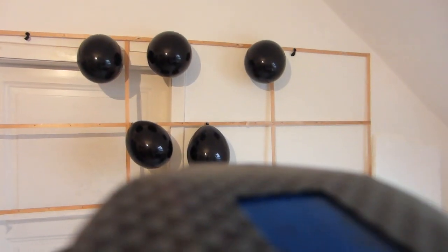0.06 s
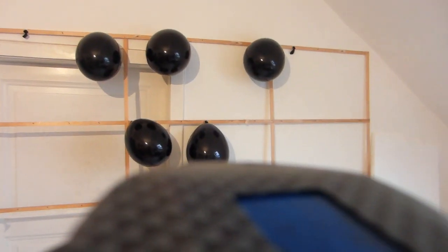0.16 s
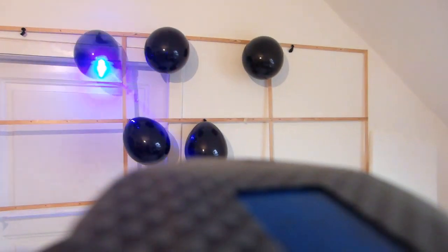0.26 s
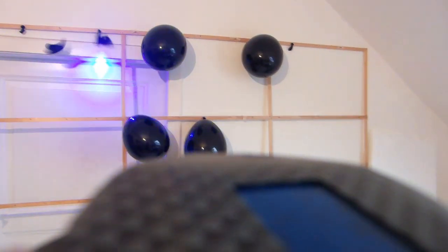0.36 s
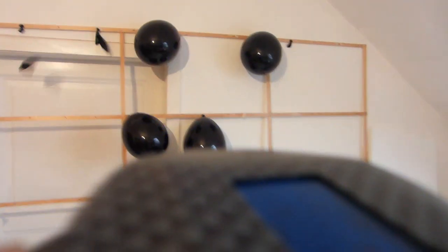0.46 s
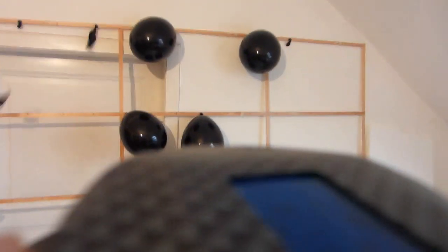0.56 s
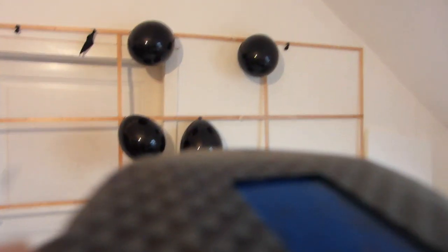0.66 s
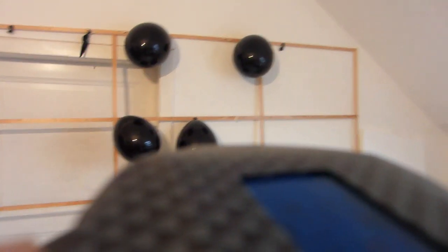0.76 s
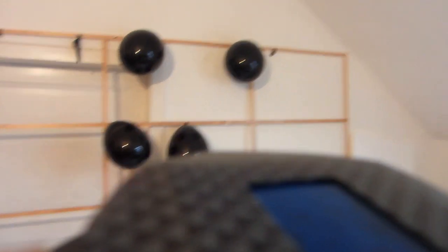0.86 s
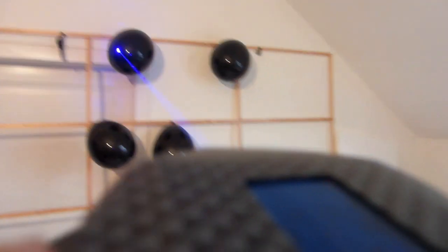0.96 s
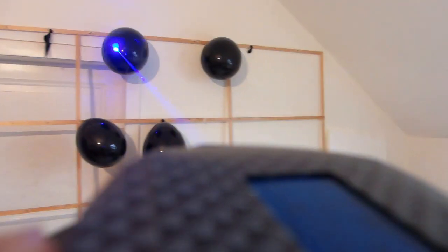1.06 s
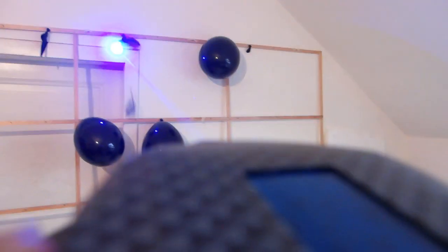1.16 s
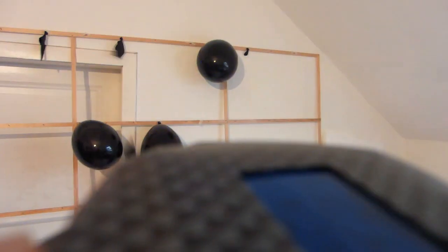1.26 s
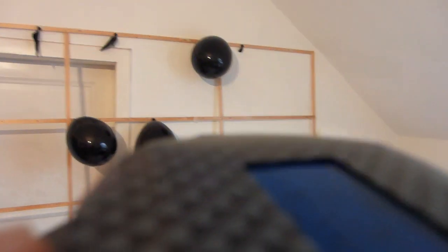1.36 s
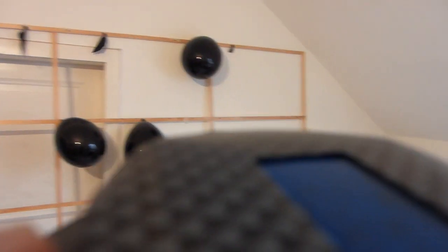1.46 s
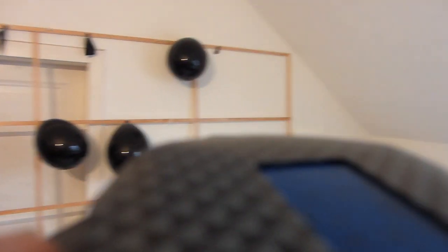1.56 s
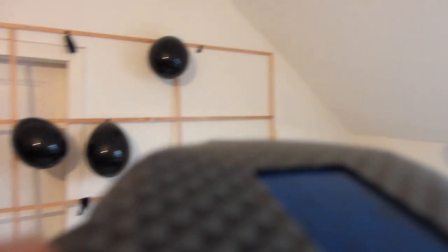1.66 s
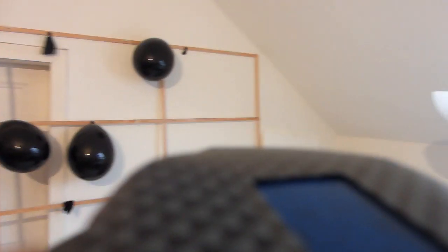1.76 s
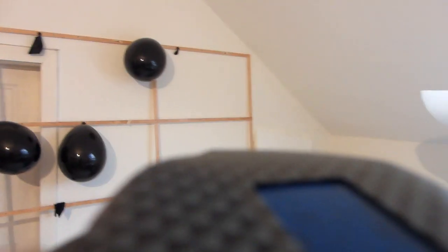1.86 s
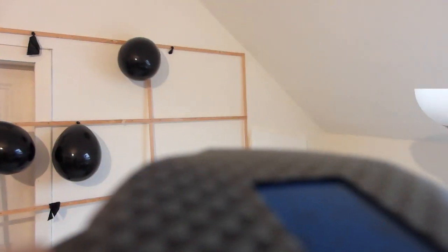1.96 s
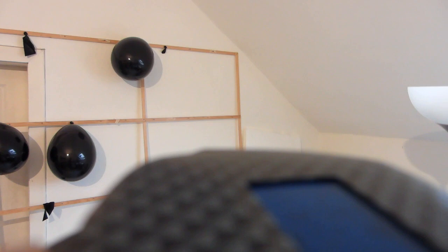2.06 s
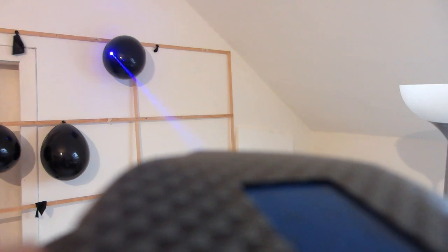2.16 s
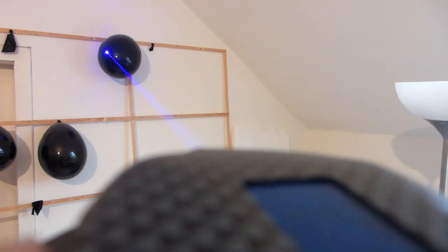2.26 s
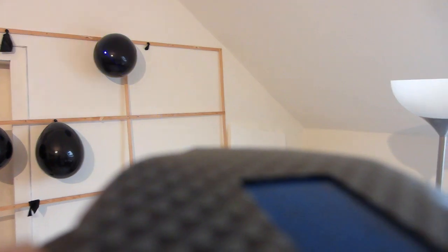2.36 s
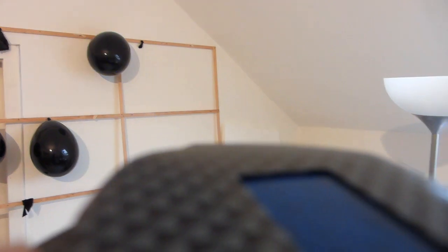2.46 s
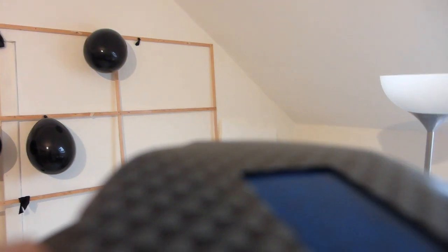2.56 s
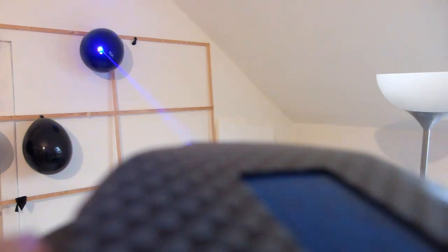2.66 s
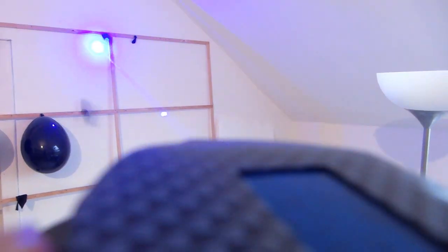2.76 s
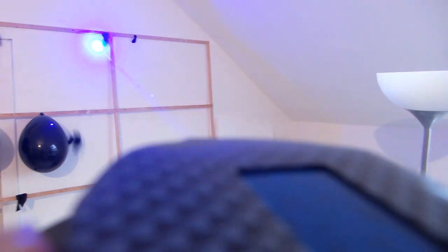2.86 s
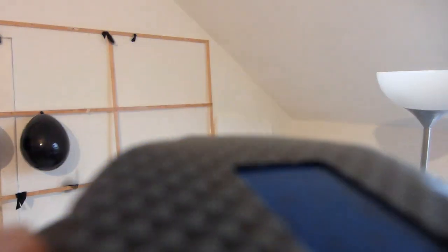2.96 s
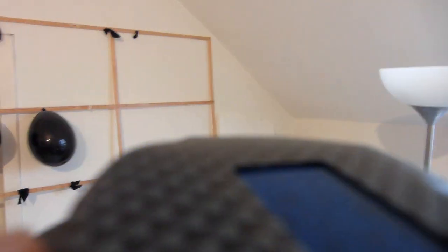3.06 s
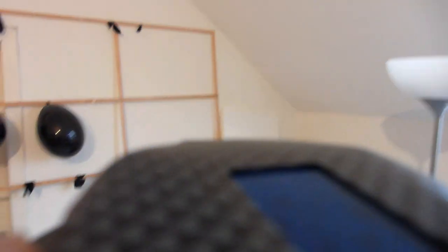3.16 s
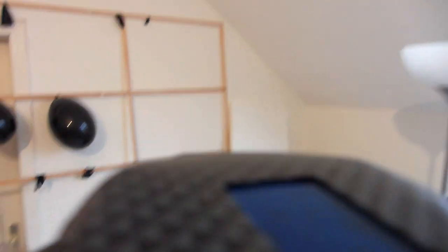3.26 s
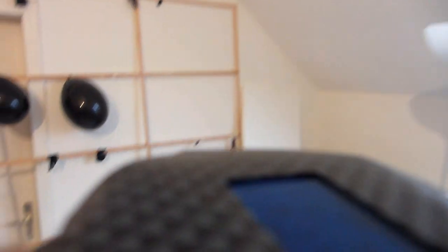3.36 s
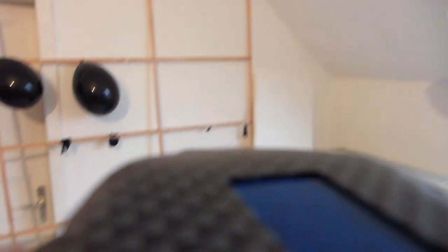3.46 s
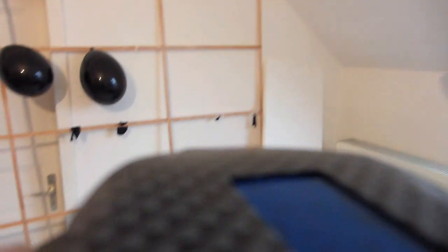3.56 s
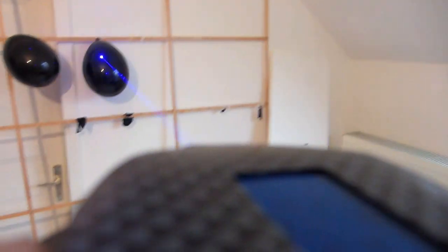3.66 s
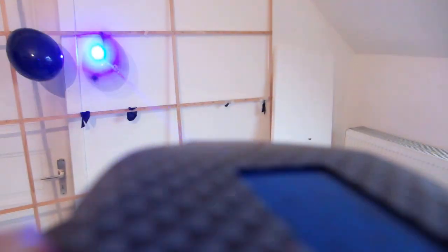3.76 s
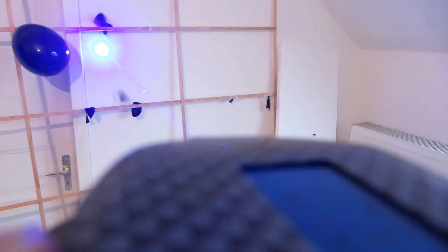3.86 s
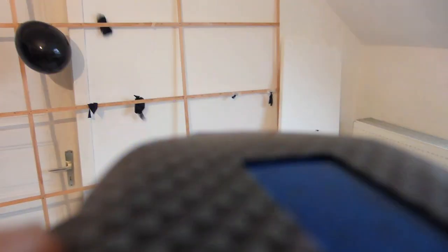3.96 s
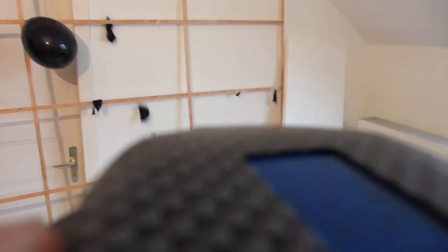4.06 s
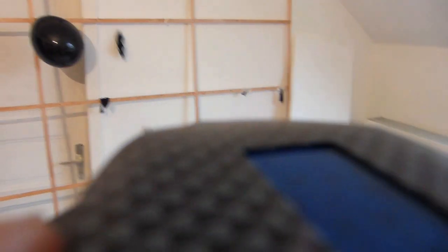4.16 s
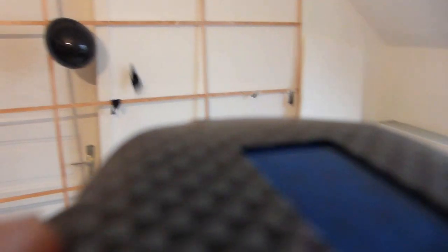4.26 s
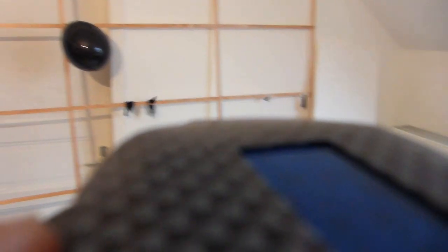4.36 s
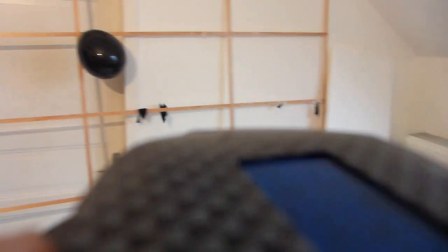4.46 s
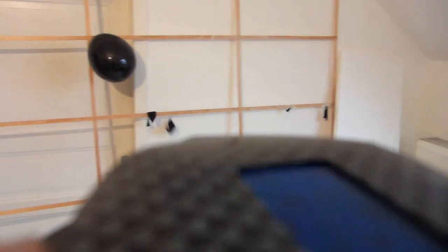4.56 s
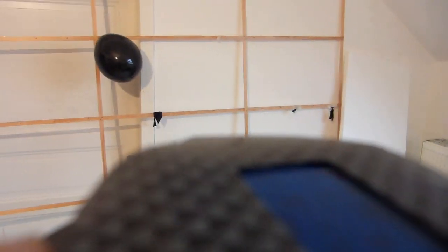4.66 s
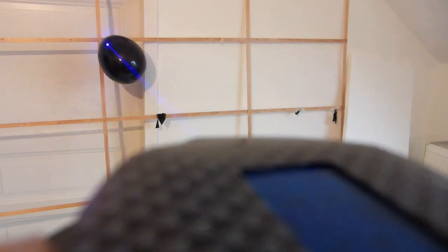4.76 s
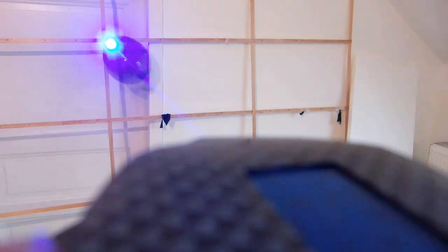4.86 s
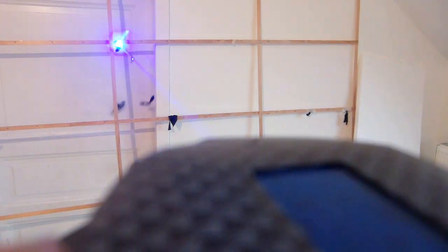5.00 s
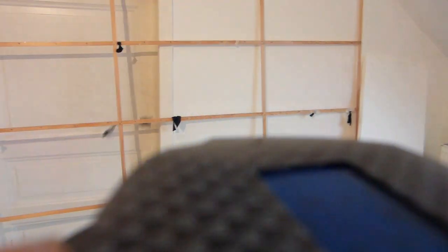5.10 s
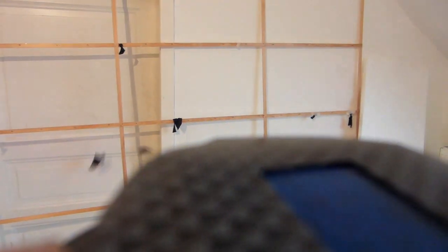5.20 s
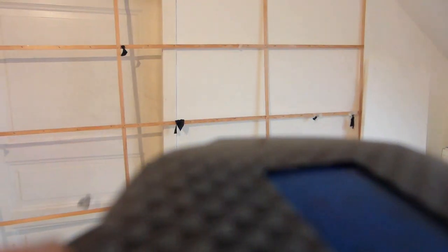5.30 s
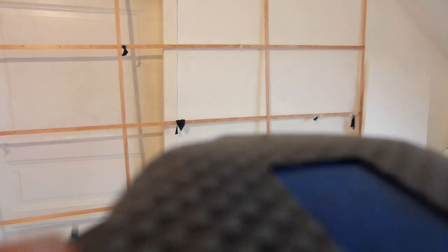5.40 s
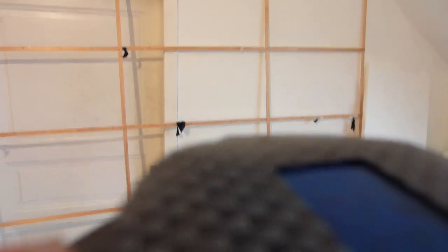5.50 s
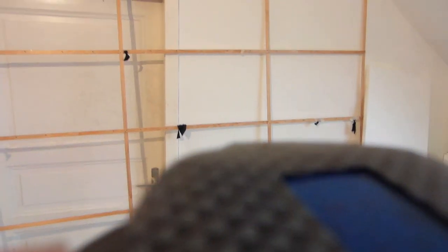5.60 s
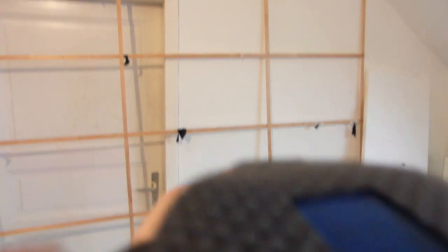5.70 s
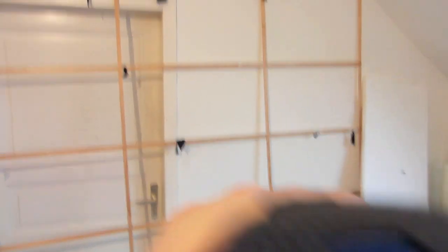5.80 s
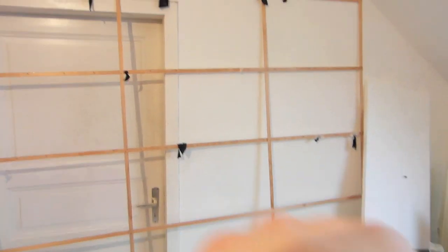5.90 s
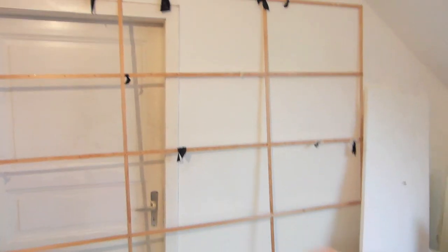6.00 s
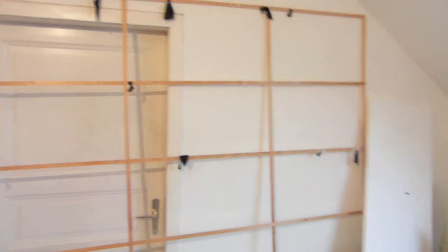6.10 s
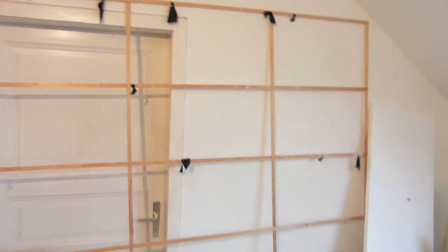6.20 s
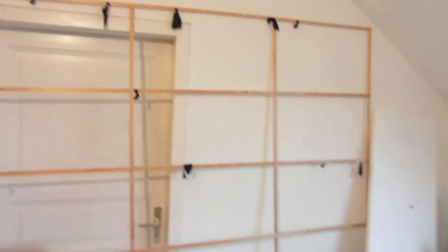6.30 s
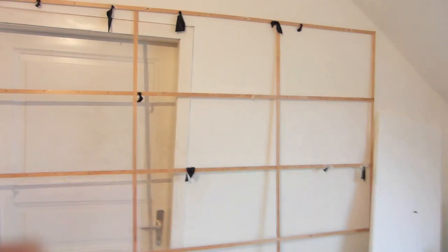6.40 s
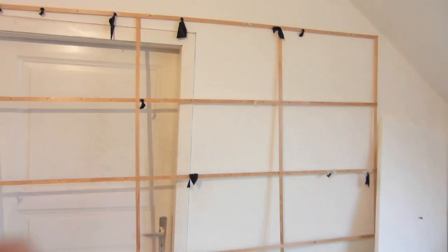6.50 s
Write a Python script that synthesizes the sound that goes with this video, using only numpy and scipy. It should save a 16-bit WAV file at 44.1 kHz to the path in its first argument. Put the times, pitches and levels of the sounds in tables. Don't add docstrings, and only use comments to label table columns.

```python
import sys
import numpy as np
from scipy import signal
from scipy.fft import rfft, irfft, next_fast_len
from scipy.io import wavfile
from scipy.ndimage import uniform_filter1d, map_coordinates

SR = 44100
rng = np.random.default_rng(int(sys.argv[2]) if len(sys.argv) > 2 else 0)


def unload_audio(sound):
    columns = np.transpose(np.atleast_2d(sound))
    steps = np.round(np.clip(columns, -1, 1) * 32767)
    wavfile.write(sys.argv[1], SR, steps.astype(np.int16))


def makeup_ratio(level_db):
    decades = np.asarray(level_db, float) / 20
    return 10 ** decades


N = 288414

# shock arrival in seconds, length of the first swing of the shock in ms.
BURSTS = [
    (.23880, 1.1),
    (1.04553, .95),
    (2.64993, .9),
    (3.72989, .72),
    (4.83640, .72),
]
# room level in dB, brightness in dB/octave,
# shift of weight from 1 to 1.5 kHz in dB, boom in dB.
BURST_COLOURS = [
    (-5, 1.5, 0, 0.5),
    (-4.5, 2, -0.5, 4),
    (-1.5, 1.5, 2, -1),
    (1, 1, 5.5, -4.5),
    (-3, 0.5, 0.5, -1),
]
# delay in ms, level in dB.
WALL_ECHOES = [(2.4, -5.5), (3.3, -12.5), (4.6, -16.5), (6.7, -12), (9.5, -12), (13, -10.5), (17.5, -17)]
# frequency in Hz, level in dB per Hz.
TAIL_MID = [(15, -71.5), (25, -40), (58, -18), (108, -16), (206, -2), (439, -2.5), (591, -3), (754, -11),
            (1400, -12.5), (2050, -19.5), (4870, -25), (5430, -31), (12500, -35.5), (15200, -42.5),
            (16000, -66)]
TAIL_SIDE = [(15, -65.5), (25, -34), (105, -25.5), (130, -17), (326, -9.5), (476, -8), (775, -7.5),
             (840, -9.5), (1520, -2), (2220, -6), (4740, -4.5), (7920, -15.5), (11300, -15), (14400, -22.5),
             (16000, -48.5)]
# frequency in Hz, t60 in seconds.
ROOM_T60 = [(60, 0.97), (160, 0.62), (420, 0.5), (1100, 0.59), (2900, 0.53), (7700, 0.47), (15000, 0.32)]
# frequency in Hz, width in Hz, level in dB.
STANDING_WAVES = [(98, 15, 6), (136, 4.1, 3.5), (206, 4.8, 3), (275, 16, 5), (355, 21, 5), (684, 10, 2.5),
                  (823, 25, 4.5)]
# frequency in Hz, left over right in dB.
LEFT_LEAN = [(60, -.5), (200, .5), (700, 1), (1300, 2.5), (4400, 2.2), (8000, .3), (15000, 0)]

PRESS_S = [.2034, .9212, 2.0698, 2.3158, 2.5868, 3.6294, 4.7384]
# frequency in Hz, width in Hz, level in dB.
BUTTON_DOME = [(4900, 1400, -8.5), (6400, 680, -14), (8700, 1300, -7), (11000, 720, 1.5),
               (15040, 2800, -6.5)]
# start in seconds, peak in dB.
SHELL_TICKS = [(0.81, -61), (1.8294, -58), (1.8947, -62), (2.0176, -59.5), (2.0355, -57), (2.2595, -66),
               (2.3505, -57), (5.5373, -55), (5.5578, -54), (5.5802, -49.5), (5.6261, -51), (5.66, -52)]

# start in seconds, peak in dB, ring in dB.
LATCH_SNAPS = [
    (5.961, -26, -8),
    (6.0077, -46, -3),
    (6.0701, -39, 1),
    (6.1102, -9.5, 3),
    (6.1741, -58.5, 2),
    (6.185, -51, 1),
    (6.3919, -17.5, 0.5),
    (6.4298, -49, 7),
]
# frequency in Hz, level in dB, t60 in seconds.
COVER_RING = [(1590, -11.5, 0.019), (1915, 0.5, 0.017), (2217, 1, 0.0148), (2705, -8.5, 0.013),
              (3930, 2, 0.0071), (4790, 0.5, .012)]
# frequency in Hz, width in Hz, level in dB.
LATCH_CRACK = [(3600, 1800, -5), (5300, 1500, 0), (8800, 2000, -14)]

# start in seconds, peak in dB, edge in dB.
KNOCKS = [(1.8395, -35.5, -14), (1.851, -43, -10), (1.9385, -34, -17), (1.9483, -34, -15),
          (2.4003, -24.5, -17), (2.409, -27.5, -23), (4.545, -51, -13), (5.742, -36, -1), (6.020, -39, -7),
          (6.029, -40, -1), (6.4579, -32.5, 0)]
# start in seconds, length in seconds, level in dB.
FINGER_SLIPS = [(1.594, 0.037, -51.5), (1.637, 0.072, -43.5), (1.756, 0.027, -39.5), (1.836, 0.025, -53),
                (1.939, 0.018, -53.5), (2.139, 0.042, -56.5), (2.395, 0.031, -48), (2.479, 0.046, -55),
                (3.193, 0.025, -46), (3.245, 0.035, -50.5), (4.353, 0.039, -36.5), (4.461, 0.047, -36.5)]
# frequency in Hz, width in Hz, level in dB.
CASE_BODY = [(194, 250, 3), (594, 240, 2), (1140, 160, -1.5), (1690, 475, -5.5), (2354, 430, -9.5),
             (4300, 1000, -14), (11300, 6000, -26)]
# time in seconds, cover chatter in dB, cloth over chatter in dB.
GRIP_SHIFTS = [
    (5.675, -62, 6.5),
    (5.835, -51.5, -10.5),
    (5.897, -47.5, -4),
    (5.94, -51.5, -16),
    (6.008, -48.5, -7),
    (6.04, -60, 1),
    (6.07, -49, -25),
    (6.177, -54.5, -8),
    (6.43, -48, -11),
    (6.492, -60, -6),
]

# start in seconds, level in dB.
SCRAP_LANDINGS = [(.895, -54.5), (2.075, -61.5), (4.26, -47.5), (4.629, -39.5), (5.32, -47.5), (5.67, -50),
                  (6.024, -48.5)]
# frequency in Hz, level in dB per Hz.
SCRAP_COLOUR = [(500, -40), (1500, -11), (3200, -4), (4600, 0), (5600, -5), (7000, -13), (9000, -10),
                (14500, -14), (16000, -30)]

# frequency in Hz, level in dB per Hz.
AIR_MID = [(12, -36), (20, 3.5), (216, -11), (255, -11), (301, -8.5), (590, -17), (698, -23.5),
           (759, -22.5), (2530, -32.5), (11800, -49.5), (16000, -50)]
AIR_SIDE = [(12, -34.5), (20, 0), (79, 0.5), (222, -16), (248, -7), (558, -15.5), (1120, -16.5),
            (1760, -15.5), (2990, -20.5), (11100, -35), (16000, -42)]
# time in seconds, level in dB.
AIR_DRIFT = [(0, -63.5), (.19, -58.5), (.8, -55), (1.5, -51), (2, -55), (3.2, -50), (4.3, -53.5),
             (5.4, -55.5), (6.54, -56.5)]
# middle in seconds, length in seconds, level in dB.
SLEEVE_BRUSHES = [(0.075, .34, -56), (1.704, .2, -67), (4.297, .2, -62), (4.56, .12, -62), (4.8, .3, -67),
                  (5.628, .2, -60), (5.797, .3, -70)]

# frequency in Hz, side over mid in dB.
NEAR_WIDTH = [(600, -9.5), (1200, 2.5), (2000, 5.5), (4000, 10), (12000, 10.5)]
# frequency in Hz, gain in dB.
CAPSULE = [(15, 0), (15300, 0), (15700, -10), (16500, -22)]

WALL_CUT_HZ = 510
PRESS_DB, PRESS_TILT_DB = -20.5, 0.7
TICK_HZ = 5200
GRIT_DB, GRIT_T60_S = -21.5, 0.012
SHELL_HZ, SHELL_SCATTER = 157, 0.11
GRIP_S, CHATTER_T60_S, CLOTH_T60_S = 0.0056, 0.19, .3
SCRAP_T60_S = 0.3
HISS_DB, FIZZ_DB, BRUSH_BODY = -63.5, -73.5, .2


def unit(x):
    return x / np.sqrt(np.mean(x ** 2) + 1e-20)


def along(points, hz):
    f, v = np.transpose(points)
    return np.interp(np.log(hz + 1), np.log(f + 1), v)


def filtered(x, response):
    m = next_fast_len(x.shape[-1] + 8192)
    spectrum = rfft(x, m) * response(np.fft.rfftfreq(m, 1 / SR))
    return irfft(spectrum, m)[..., :x.shape[-1]]


def tilt(hz, slope_db):
    return makeup_ratio(slope_db * np.log2((hz + 30) / 1000))


def resonances(modes):
    def mode(f, centre, width, db):
        return makeup_ratio(db) * 1j * f * width / (centre * centre - f * f + 1j * f * width)
    return lambda f: sum((-1) ** k * mode(f, *row) for k, row in enumerate(modes))


def pair(mid_side, mid, side, side_db):
    m, s = filtered(mid_side, lambda hz: makeup_ratio([along(mid, hz), along(side, hz) + side_db]))
    return np.array([m + s, m - s])


def widened(x, like=0.079):
    share = lambda hz: 1 / np.sqrt(1 + makeup_ratio(2 * along(NEAR_WIDTH, hz)))
    mid = filtered(x, share)
    side = filtered(x, lambda hz: share(hz) * makeup_ratio(along(NEAR_WIDTH, hz)))
    mid = like * mid + np.sqrt(abs(1 - like ** 2)) * signal.hilbert(mid).imag
    return np.array([mid + side, mid - side])


def add(track, s, sound):
    part = track[..., round(s * SR):][..., :sound.shape[-1]]
    part += sound[..., :part.shape[-1]]


def shock_and_walls(swing_ms):
    u = 1000 * np.arange(SR // 100) / SR / swing_ms
    shock = -2.5 * np.sin(np.pi * (.12 + .88 * u)) * np.exp(-u / 1.6) * (u < 2.14)
    shock = np.convolve(shock, np.hanning(6) / 2.5)
    walls = np.zeros(SR // 40)
    for lag_ms, wall_db in WALL_ECHOES:
        walls[round(lag_ms * rng.uniform(.9, 1.1) * SR / 1000)] = makeup_ratio(wall_db + 0.5)
    front = filtered(np.convolve(shock, walls), lambda f: 1j * f / (WALL_CUT_HZ + 1j * f))
    add(front, 0, shock)
    return front


def attic_tail(room_db, slope_db, honk_db, boom_db):
    hz, frame_s, z = signal.stft(rng.standard_normal((2, SR + SR // 4)), SR, nperseg=256)
    honk = honk_db / (1 + ((hz - 1500) / 280) ** 2) - honk_db / (1 + ((hz - 950) / 200) ** 2)
    boom = boom_db / (1 + (hz / 400) ** 2)
    colour = tilt(hz, slope_db) * makeup_ratio(honk + boom)
    decay = makeup_ratio(-60 * frame_s / along(ROOM_T60, hz)[:, None])
    tail = signal.istft(z * decay * colour[:, None], SR, nperseg=256)[1]
    tail = pair(tail, TAIL_MID, TAIL_SIDE, side_db=-9.5)
    tail = filtered(tail, lambda f: makeup_ratio(sum(db / (1 + (2 * (f - c) / w) ** 2) for c, w, db in STANDING_WAVES)))
    t = np.arange(tail.shape[1]) / SR
    tear = 1 + 0.97 * makeup_ratio(-60 * t / 0.088)
    rise = 1 - np.exp(-(t / .0034) ** 2)
    return makeup_ratio(room_db + 22.5) * tail * tear * rise


def balloons():
    out = np.zeros((2, N))
    for (s, swing_ms), colour in zip(BURSTS, BURST_COLOURS):
        add(out, s, shock_and_walls(swing_ms) * makeup_ratio([[.5], [-.5]]))
        add(out, s, attic_tail(*colour))
    return filtered(out, lambda hz: makeup_ratio([along(LEFT_LEAN, hz) / 2, -along(LEFT_LEAN, hz) / 2]))


def buttons():
    out, t = np.zeros(N), np.arange(SR // 5) / SR
    dome = lambda hz: resonances(BUTTON_DOME)(hz) * tilt(hz / 8, PRESS_TILT_DB)
    shell = lambda f: resonances([(TICK_HZ, .8 * TICK_HZ, 0)])(f) ** 2
    for s in PRESS_S:
        bounce = .45 * (t > .001) * makeup_ratio(-60 * t / .008)
        snap = makeup_ratio(-60 * t / .003) + bounce + .003 * makeup_ratio(-60 * t / .3)
        crack = filtered(snap * rng.standard_normal(len(t)), dome)
        add(out, s, makeup_ratio(PRESS_DB) * crack / np.abs(crack).max())
    for s, db in SHELL_TICKS:
        tick = filtered(makeup_ratio(-60 * t / 0.0029) * rng.standard_normal(len(t)), shell)
        add(out, s, makeup_ratio(db + 13.5) * tick / np.abs(tick).max())
    return widened(out) * makeup_ratio([[1.5], [-2]])


def latch():
    out, blows, t = np.zeros(N), np.zeros(N), np.arange(SR // 16) / SR
    there_and_back = np.array([1] + [0] * 34 + [-.9] + [0] * 50 + [.4])
    for s, db, ring_db in LATCH_SNAPS:
        ring = np.zeros(len(t))
        for hz, level, t60 in COVER_RING:
            ring += makeup_ratio(level + rng.normal(0, 1) - 60 * t / t60) * np.sin(2 * np.pi * hz * t)
        grit = np.diff(rng.standard_normal(len(t) + 1))
        add(out, s, makeup_ratio(db + 6.0 + ring_db) * ring * (1 - np.exp(-(t / 0.0023) ** 2)))
        add(out, s + 0.00062, makeup_ratio(db + GRIT_DB - 60 * t / GRIT_T60_S) * grit)
        add(blows, s + 0.00039, makeup_ratio(db + 24) * there_and_back)
    crack = filtered(blows, lambda f: resonances(LATCH_CRACK)(f) / (1 + 1j * f / 7000) ** 2)
    return widened(out + crack) * makeup_ratio([[1], [-1]])


def knocks():
    out, t = np.zeros((2, N)), np.arange(SR // 16) / SR
    for s, db, edge_db in KNOCKS:
        pitch_hz = SHELL_HZ * (1 + SHELL_SCATTER * rng.standard_normal())
        thud = -np.sin(2 * np.pi * pitch_hz * t) * makeup_ratio(-60 * t / .05) * (1 - np.exp(-t / .0012))
        skin = uniform_filter1d(uniform_filter1d(rng.standard_normal(len(t)), size=20), size=6)
        edge = skin * makeup_ratio(edge_db + 8 - 60 * t / 0.0108)
        add(out, s, makeup_ratio(db + 3) * thud * makeup_ratio([[0], [-16]]))
        add(out, s - .0015, makeup_ratio(db + 4.5) * edge * makeup_ratio([[0], [-10]]))
    return out


def rubs():
    pulses = np.zeros(N)
    for s, length, db in FINGER_SLIPS:
        when = np.cumsum(rng.uniform(.001, 0.0025, 60))
        swell = np.sin(np.pi * np.clip(when / length, 0, 1)) ** 0.36
        size = makeup_ratio(db + 3.5 * rng.standard_normal(60)) * swell
        pulses[np.round((s + when) * SR).astype(int)] -= size
        t = np.arange(round(length * SR)) / SR
        scrape = rng.standard_normal(len(t)) * np.sin(np.pi * t / length) ** 1.5
        add(pulses, s, makeup_ratio(db - 26.5) * scrape)
    body = lambda f: resonances(CASE_BODY)(f) * (0.45 + 0.49 / (1 + (f / 2800) ** 8))
    slip = makeup_ratio(31) * filtered(pulses, body)
    return filtered(widened(slip), lambda hz: makeup_ratio([0 * hz + 3, -1 - 10 / (1 + (hz / 900) ** 2)]))


def rustle():
    t = np.arange(N) / SR

    def swell(s, t60):
        return np.where(t < s, np.exp(-((t - s) / GRIP_S) ** 2), makeup_ratio(-60 * np.abs(t - s) / t60))

    chatter = sum(makeup_ratio(db) * swell(s, CHATTER_T60_S) for s, db, _ in GRIP_SHIFTS)
    cloth = sum(makeup_ratio(db + over_db) * swell(s, CLOTH_T60_S) for s, db, over_db in GRIP_SHIFTS)
    clumps_db = unit(uniform_filter1d(rng.standard_normal((2, N)), size=120)) * [[4.5], [3]]
    grains = rng.standard_normal((2, N)) * makeup_ratio(clumps_db)
    cover = lambda f: resonances([(2150, 800, 0)])(f) ** 2 + resonances([(1600, 500, -3)])(f) ** 2
    fabric = lambda f: resonances([(4300, 3000, 0)])(f) ** 3 + resonances([(10500, 5000, -18)])(f)
    rattle = filtered(grains[0], cover)
    swish = filtered(grains[1], fabric)
    return widened(chatter * unit(rattle) + cloth * unit(swish))


def scraps():
    out, t = np.zeros(N), np.arange(SR // 3) / SR
    for s, db in SCRAP_LANDINGS:
        hiss = unit(filtered(rng.standard_normal(len(t)), lambda hz: makeup_ratio(along(SCRAP_COLOUR, hz))))
        add(out, s, makeup_ratio(db - 60 * t / SCRAP_T60_S) * (1 - np.exp(-t / 0.0038)) * hiss)
    return widened(out)


def air():
    t = np.arange(N) / SR
    brush = sum(makeup_ratio(db) * np.exp(-(2 * (t - s) / length) ** 2) for s, length, db in SLEEVE_BRUSHES)
    tone = pair(rng.standard_normal((2, N)), AIR_MID, AIR_SIDE, side_db=-6)
    low = filtered(tone, lambda hz: 1 / (1 + (hz / 900) ** 2))
    bright = widened(unit(filtered(rng.standard_normal(N), resonances([(10040, 1300, 0)]))))
    lumps = map_coordinates(rng.standard_normal(int(N * 14 / SR) + 4), [t * 14])
    room_tone = makeup_ratio(np.interp(t, *np.transpose(AIR_DRIFT)) + 0.82 * lumps) * unit(low)
    hiss = (makeup_ratio(HISS_DB) + BRUSH_BODY * brush) * unit(tone - low)
    fizz = (makeup_ratio(FIZZ_DB) + brush) * bright
    return room_tone + hiss + fizz


def scene():
    return balloons() + buttons() + latch() + knocks() + rubs() + rustle() + scraps() + air()


def band_limit(x):
    return signal.sosfilt(signal.butter(12, 16440, fs=SR, output="sos"), x)


def record(dry):
    keep = np.exp(-1 / (.0045 * SR))
    late = np.pad(np.mean(dry ** 2, 0), (70, 0))[:N]
    level_db = 10 * np.log10(signal.lfilter([1 - keep], [1, -keep], late) + 1e-12)
    cut_db = 0.45 * 3 * np.logaddexp(0, (level_db + 33.0) / 3)
    x = filtered(dry * makeup_ratio(-cut_db), lambda f: 1 - resonances([(7930, 260, -2)])(f))
    x = filtered(x, lambda f: 1j * f / (60 + 1j * f))
    x = x / (1 + np.abs(x / .96) ** 8) ** (1 / 8)
    return band_limit(filtered(x, lambda hz: makeup_ratio(along(CAPSULE, hz))))


dry = scene()
out = record(dry)
unload_audio(out)
```